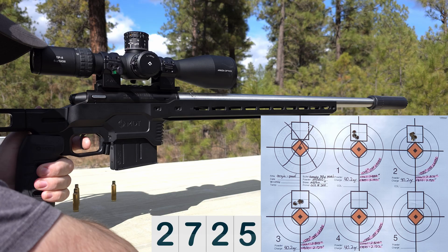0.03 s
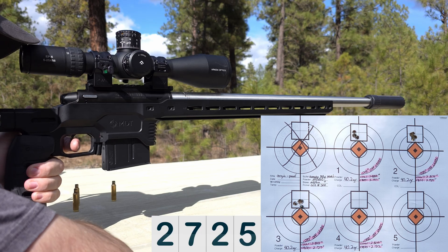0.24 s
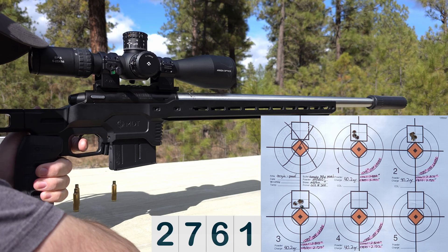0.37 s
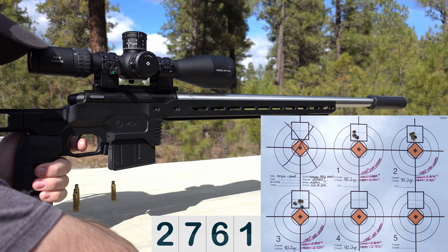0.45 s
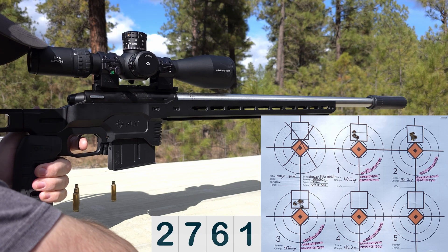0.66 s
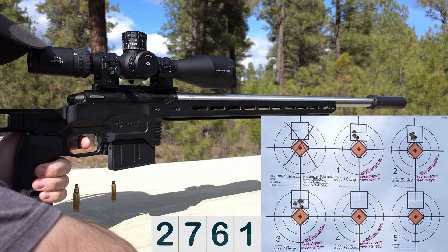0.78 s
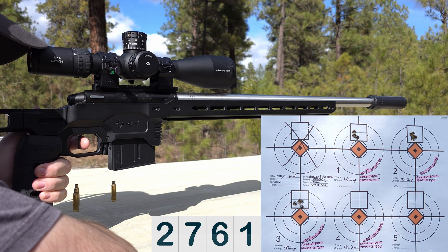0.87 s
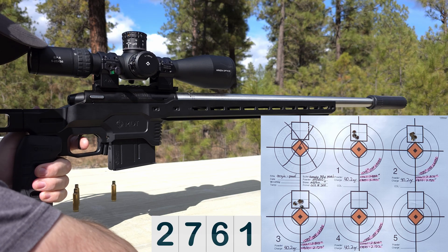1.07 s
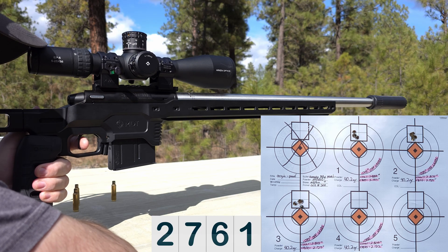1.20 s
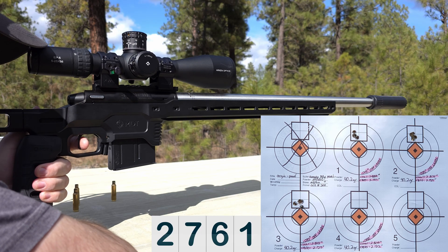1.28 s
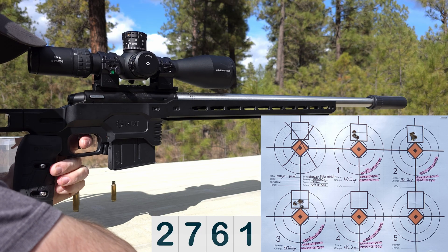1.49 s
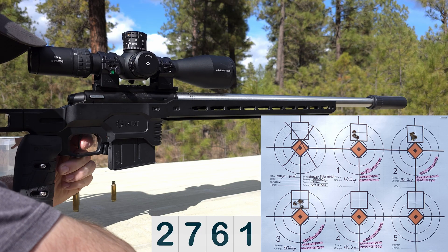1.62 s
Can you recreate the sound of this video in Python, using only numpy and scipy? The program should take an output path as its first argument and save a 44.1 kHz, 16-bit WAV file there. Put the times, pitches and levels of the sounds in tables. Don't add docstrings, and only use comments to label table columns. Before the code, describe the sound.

Very quiet outdoor wind, then one abrupt rifle shot at about a metre, squashed and distorted; bright echoes spray off trunks and darken as they fade, before a sudden cut to soft metallic scraping.

```python
import sys
import numpy as np
from scipy import signal
from scipy.fft import rfft, irfft
from scipy.io import wavfile
from scipy.ndimage import uniform_filter1d

SR = 44100
rng = np.random.default_rng(int(sys.argv[2]) if len(sys.argv) > 2 else 0)


def volts(x):
    e = np.asarray(x, float) / 20
    return 10 ** e


def wav_record(signal):
    frames = np.transpose(np.atleast_2d(signal))
    bounded = np.clip(frames, -1, 1)
    quanta = np.round(bounded * 32767).astype(np.int16)
    wavfile.write(sys.argv[1], SR, quanta)


N = 72765
SHOT_S, EDIT_S = 0.2205, 1.4025


def unit(x):
    return x / np.sqrt(np.mean(x ** 2))


def noise():
    return rng.standard_normal(N)


def curve(rows, t):
    return np.interp(t, *np.array(rows).T[:2])


def colour(x, rows):
    hz, db = np.array(rows).T[:2]
    f = np.fft.rfftfreq(N, 1 / SR) + 1
    gain = volts(np.interp(np.log(f), np.log(hz), db))
    return unit(irfft(rfft(x) * gain, N))


def ring(x, hz, width_hz):
    b, a = signal.iirpeak(min(hz, 0.45 * SR), hz / width_hz, fs=SR)
    return signal.lfilter(b, a, x)


def walk(rate_hz):
    hold = int(SR / rate_hz)
    steps = np.repeat(rng.standard_normal(2000), hold)[:N]
    return unit(uniform_filter1d(uniform_filter1d(steps, hold), hold))


def wind(shape, db):
    return volts(db + 1.5 * walk(36)) * colour(noise(), shape)


def wind_around_shot(t):
    # frequency in Hz, level in dB
    wind_shape = [(40, -27), (110, -9.5), (300, -13), (800, 0.5), (1500, -14.5), (2300, -32), (5100, -21),
                  (9000, -38.5)]
    duck_db = -18.5 * (t > SHOT_S) * np.exp(-(t - SHOT_S) / 1.6)
    return wind(wind_shape, -66.5 + duck_db)


def slaps(t):
    # start in seconds, peak level in dB, pitch in Hz, length in cycles
    bursts = [(.063, -56, 850, 7), (.152, -59, 800, 5), (.2255, -12, 1500, 4), (.231, -11, 6200, 12),
              (.234, -11, 8300, 14), (.2555, -11, 5500, 9), (.2775, -7, 5200, 9), (.281, -20, 920, 7),
              (.301, -10, 6500, 5), (.3105, -10, 5500, 4), (.316, -17, 1300, 4), (.325, -22, 260, 3),
              (.3285, -11, 850, 1.6), (.335, -11, 4600, 8), (.344, -6, 4600, 6), (.375, -30, 160, 4),
              (.386, -14, 2800, 5), (.4215, -6, 5600, 5), (.45, -21, 900, 3), (.492, -22, 2800, 8),
              (.557, -26, 520, 3), (.575, -28, 500, 3), (.597, -23, 750, 2.5), (.634, -21, 550, 1.8),
              (.647, -31, 450, 2), (.6945, -47, 11500, 2.5), (.9, -33, 900, 2), (.934, -33, 1500, 2.5),
              (.975, -36, 580, 9)]
    out = 0
    for start, db, hz, cycles in bursts:
        phase = (t - start) * hz
        bell = np.exp(-(phase / cycles * 2 - 1) ** 2 * 2)
        out = out + volts(db) * bell * np.sin(2 * np.pi * phase)
    return out


def gas(t):
    # frequency in Hz, level in dB
    jet_shape = [(300, -22), (900, 1), (1800, -11), (3500, -11), (5800, -1), (8300, -7.5), (12000, -14),
                 (16000, -24)]
    rise_s, hold_s, fall_s = 0.0059, 0.017, 0.027
    u = np.maximum(t - SHOT_S, 0)
    env = np.minimum(u / rise_s, 1) ** 2 * np.exp(-np.maximum(u - hold_s, 0) / fall_s)
    return volts(-12.5 + 2.5 * walk(400)) * env * colour(noise(), jet_shape)


def boom(t):
    # frequency in Hz, level in dB, 60 dB decay time in seconds, onset after the shot in seconds
    modes = [(423.2, -14, .1, .004), (711, -12.5, 0.077, 0.0053), (292.9, -16, 0.46, 0.0139),
             (501, -14, .3, .03), (201.2, -25, .5, .012), (105.2, -24.5, 0.65, 0.015),
             (579.3, -18.5, 0.3, 0.069), (338.4, -24, 0.54, .006), (59, -37.5, 0.1, .03),
             (194.6, -23, 0.34, 0.066)]
    end_s, fade_s, rough_db = 0.31, 0.025, 3
    out = 0
    for hz, db, t60, late in modes:
        u = np.maximum(t - SHOT_S - late, 0)
        phase = 2 * np.pi * hz * u + 1.2 * walk(130)
        level = volts(db - 60 * u / t60 + rough_db * walk(120))
        out = out + level * (1 - np.exp(-u / 0.0027)) * np.sin(phase)
    return out / (1 + np.exp(np.clip((t - end_s) / fade_s, -30, 30)))


def wood(t):
    # frequency in Hz, level at the shot in dB, loss in dB per second
    bands = np.array([(45.2, -81.5, 30.5), (86, -47, 32.5), (130, -37.5, 48), (280, -44, 41),
                      (550, -31, 27.5), (1050, -33, 30), (1890, -27, 36.5), (3456, -23, 47),
                      (4900, -11, 64.5), (7500, -18.5, 89), (10700, -24.5, 110.5), (16000, -35.5, 142)])
    # time in seconds, level in dB
    limiter_gain = [(.225, -14), (.25, -10), (.275, -2.5), (.3, -7), (.335, 2), (.37, -1), (.5, -2.5), (.9, -2),
                    (1.4, 3.5)]
    hail_per_s, spread_db, hail_db, patchy_db = 2200, 2.4, -3, 1.5
    bass_late_s, bass_late_hz = 0.066, 3800

    chance, sign, size = rng.random((3, N))
    hail = (chance < hail_per_s / SR) * np.sign(sign - 0.5) * volts(-spread_db * np.log(size))
    spectrum = rfft(noise() + volts(hail_db) * unit(hail))
    octave = np.log2(np.fft.rfftfreq(N, 1 / SR) + 1)
    u = np.maximum(t - SHOT_S, 0)
    shared = walk(30)
    out = 0
    for centre in np.arange(5.5, 14.1, 1 / 3):
        window = np.cos(np.clip((octave - centre) * 3, -1, 1) * np.pi / 2) ** 2
        band = unit(irfft(spectrum * window, N))
        db = np.interp(centre, np.log2(bands[:, 0]), bands[:, 1])
        loss = np.interp(centre, np.log2(bands[:, 0]), bands[:, 2])
        slowness = 1 / (1 + (2 ** centre / bass_late_hz) ** 4)
        build = (1 - np.exp(-(u / bass_late_s) ** 3)) ** slowness
        out = out + band * build * volts(db - loss * u + patchy_db * (walk(14) + 0.32 * shared))
    return out * volts(curve(limiter_gain, t)) * (u > 0)


def overload(t, low):
    trough = signal.lfilter([0.04], [1, -0.96], np.maximum(-low, 0))
    around_peak = np.exp(-((t - SHOT_S - 0.021) / 0.018) ** 2)
    return np.exp(-22 * trough * around_peak)


def wind_later():
    # frequency in Hz, level in dB
    later_shape = [(40, -13), (100, -3), (280, -6), (550, 1.5), (1700, -12.5), (2200, -30.5), (5000, -11.5),
                   (16000, -35)]
    return wind(later_shape, -59)


def scrape(t):
    # frequency in Hz, width in Hz, level in dB, late gain in dB per second
    case_modes = [(4950, 200, -1.5, 4), (7280, 170, -3.5, 0), (13500, 80, -28, 110), (5570, 190, -15, 3),
                  (6300, 280, -12, -8), (9660, 300, -26, -2), (4300, 310, -8.5, -80), (7900, 280, -15, -60)]
    # time in seconds, scraping effort in dB
    effort = [
        (1.403, -46),
        (1.415, -56),
        (1.43, -47.5),
        (1.445, -53.5),
        (1.465, -55.5),
        (1.48, -48.5),
        (1.495, -52),
        (1.505, -58),
        (1.522, -79),
    ]
    u = np.maximum(t - EDIT_S, 0)
    stop_db = -490 * np.maximum(t - effort[-1][0], 0)
    grit = noise() * volts(1.8 * walk(250) + curve(effort, t) + stop_db) * (u > 0)
    out = 0
    for hz, width, db, late_db in case_modes:
        mode = ring(ring(grit, hz, 3 * width), hz, width)
        out = out + volts(db + late_db * np.minimum(u, 0.12)) * np.sqrt(SR / 3 / width) * mode
    return out


def handling(t):
    u = np.maximum(t - EDIT_S, 0)
    hiss = volts(-59.5) * np.exp(-(u / 0.04) ** 2) * unit(ring(noise(), 8000, 9000))
    thud = volts(-48.5) * np.exp(-u / 0.025) * (1 - np.exp(-u / 0.0064)) * np.sin(2 * np.pi * 116.6 * u)
    cloth = unit(ring(ring(noise(), 9200, 600), 9200, 600))
    rustle = volts(-80 + 6 * (u - 0.15) * 10 + 3 * walk(40)) * cloth
    return hiss + thud + rustle


def tinks(t):
    # start in seconds, ringing pitch in Hz, peak level in dB, 60 dB decay time in seconds
    knocks = [
        (1.405, 4950, -37, 0.019),
        (1.411, 4880, -39.5, 0.055),
        (1.412, 7280, -44, 0.056),
        (1.424, 7280, -39, 0.034),
        (1.425, 4900, -46, 0.028),
        (1.4695, 4956, -38, 0.054),
        (1.484, 4950, -47.5, 0.053),
        (1.488, 13500, -55, .05),
        (1.502, 4950, -52, 0.045),
    ]
    out = 0
    for start, hz, db, t60 in knocks:
        u = np.maximum(t - start, 0)
        level = volts(db - 60 * (u / t60) ** 1.01 + 1.2 * walk(300))
        attack = 1 - np.exp(-u / 0.00033)
        out = out + level * attack * np.sin(2 * np.pi * hz * u + 0.88 * walk(300))
    return out


def scene():
    t = np.arange(N) / SR
    low = boom(t)
    shot = low + overload(t, low) * (gas(t) + wood(t)) + slaps(t) + wind_around_shot(t)
    case = scrape(t) + tinks(t) + handling(t) + wind_later()
    after = np.clip((t - EDIT_S) / 0.0015, 0, 1)
    return (shot * (1 - after) + after * case)[None]


def band_limit(x):
    return signal.sosfilt(signal.butter(12, 16790, fs=SR, output="sos"), x)


def record(dry):
    ceiling = 0.72
    x = ceiling * np.tanh(dry / ceiling)
    x = signal.sosfilt(signal.butter(4, 62, "high", fs=SR, output="sos"), x)
    x = signal.sosfilt(signal.ellip(8, 0.2, 70, 15900, fs=SR, output="sos"), x)
    return band_limit(x)


dry = scene()
out = record(dry)
wav_record(out)
```